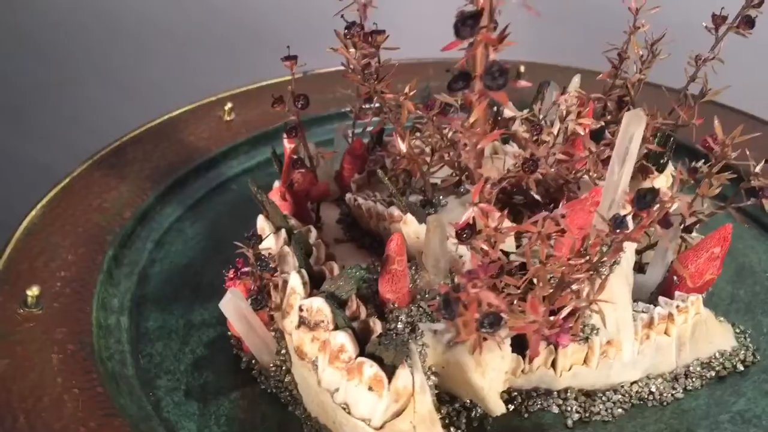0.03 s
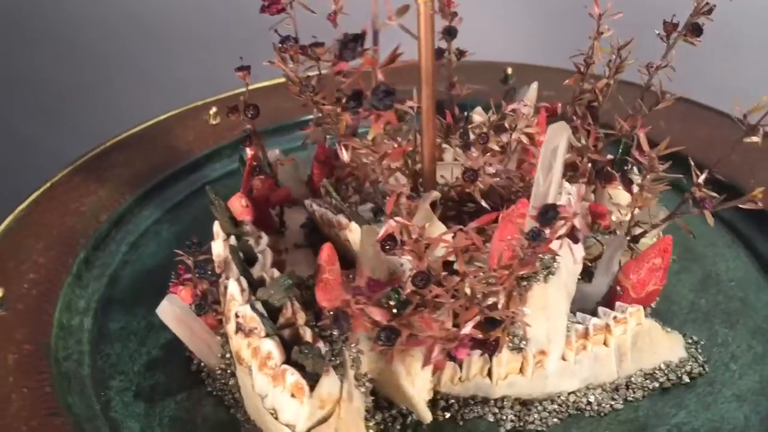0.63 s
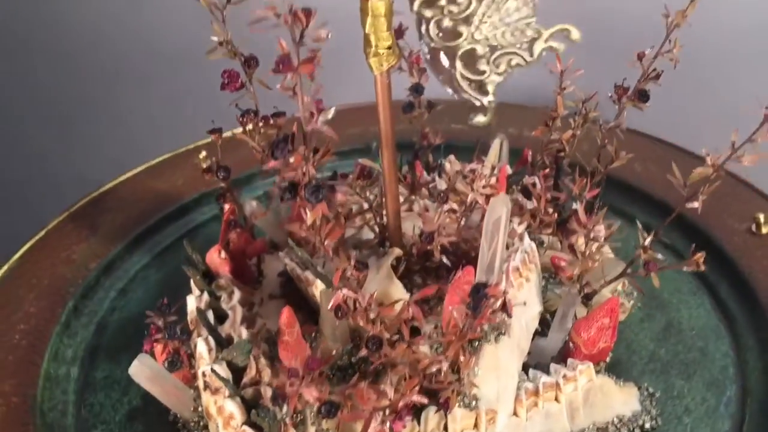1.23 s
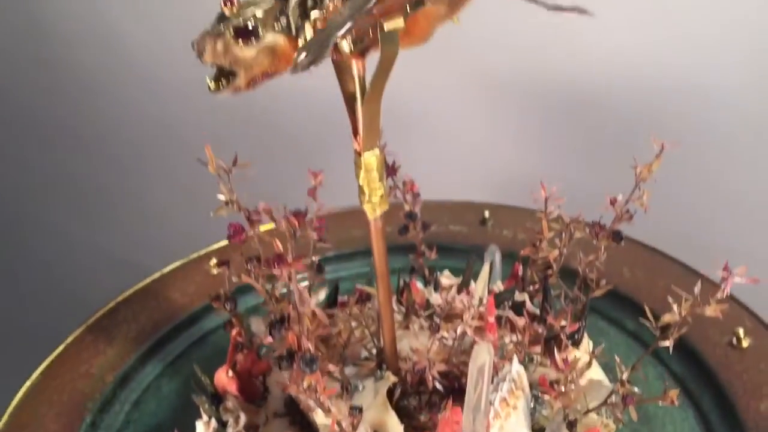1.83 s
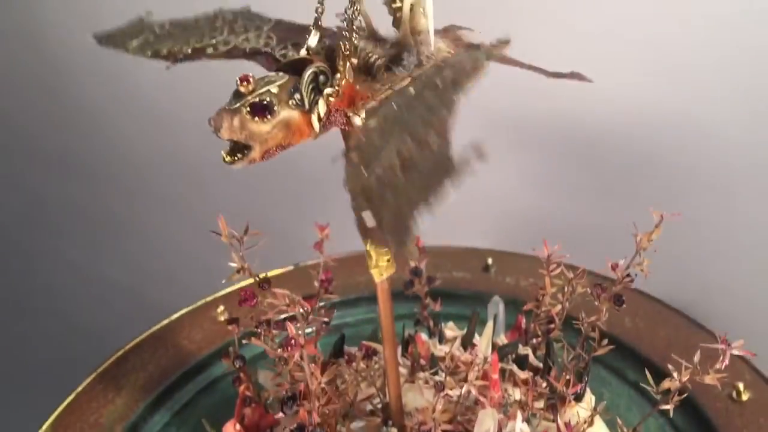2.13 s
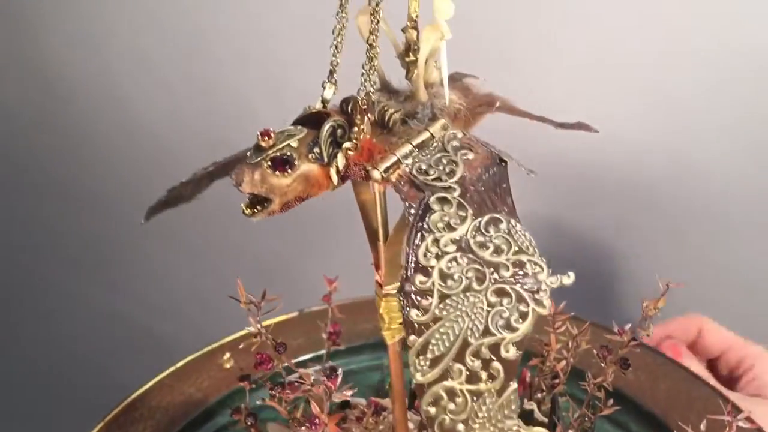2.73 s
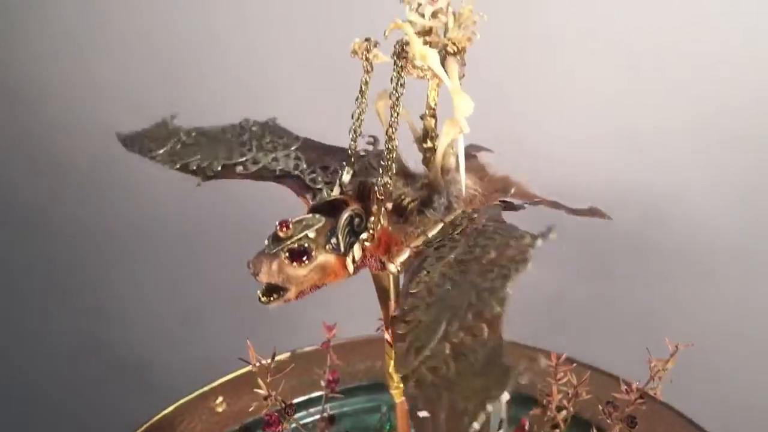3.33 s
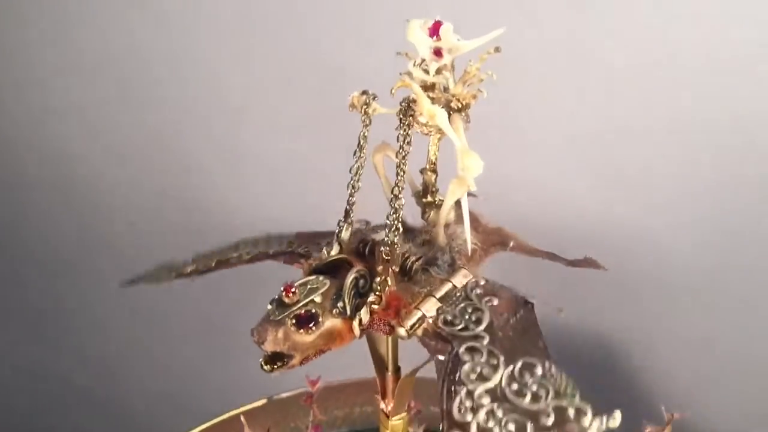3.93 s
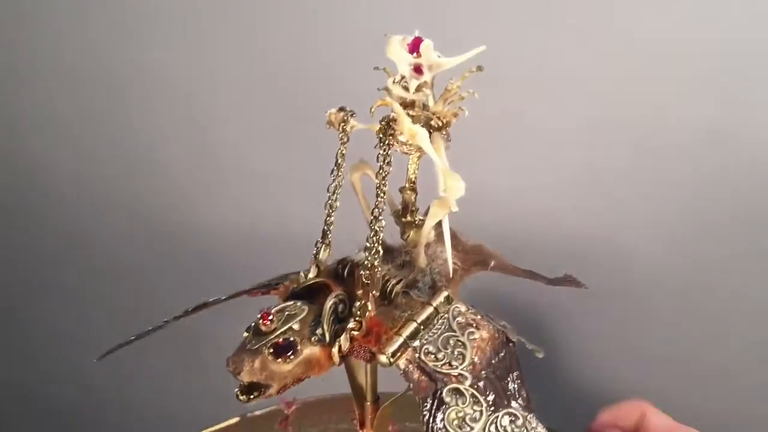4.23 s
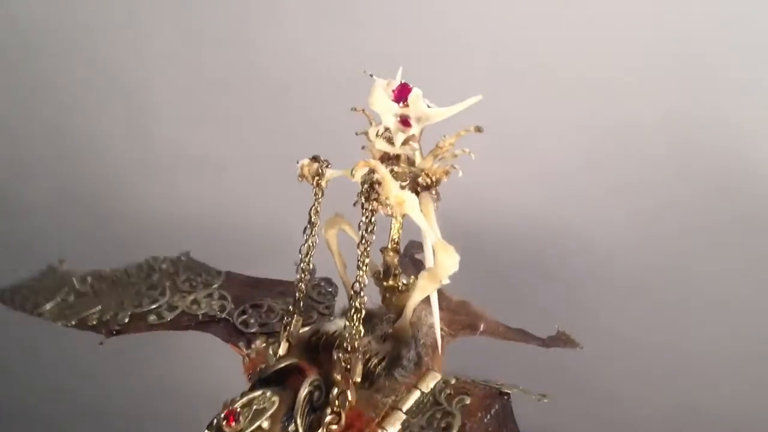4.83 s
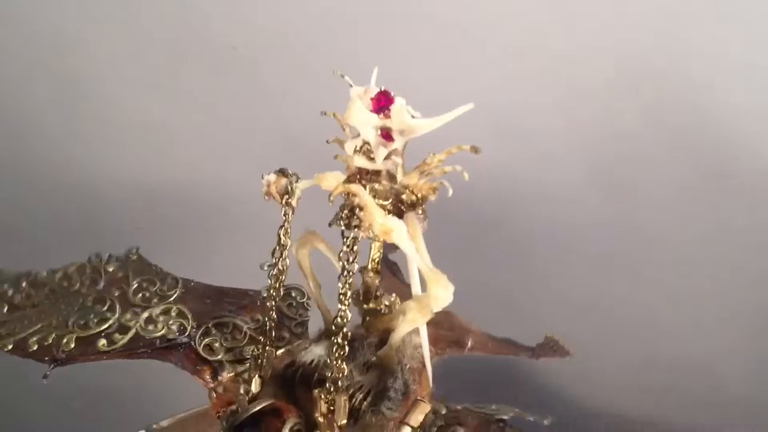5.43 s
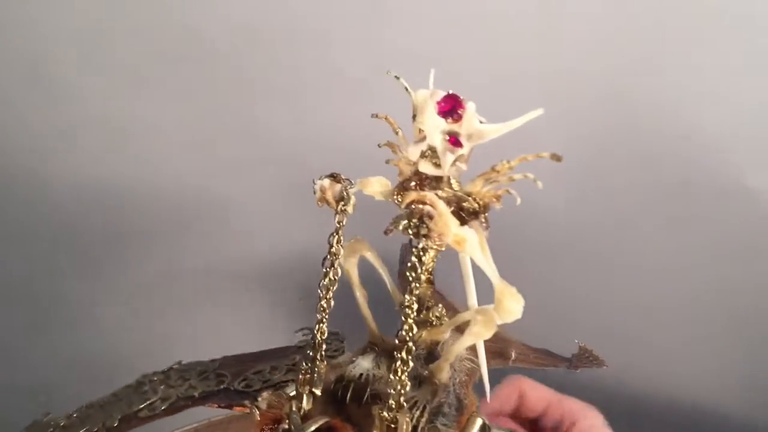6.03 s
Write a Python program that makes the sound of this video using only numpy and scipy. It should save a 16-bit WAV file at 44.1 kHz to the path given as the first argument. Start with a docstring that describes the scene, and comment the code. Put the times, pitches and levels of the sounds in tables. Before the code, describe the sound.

A small hand-cranked automaton flaps its metal wings, heard close by in a quiet room. Cams, rods and chains click and clack unevenly in a hollow wooden base, some knocks chattering or bouncing briefly. Faint hinge creaks, tiny squeaks and metal ticks fall between them, while a soft rubbing rumble swells and rests with each turn. A tight cluster of sharper clacks comes at the end.

```python
"""In a quiet room, a hand-cranked automaton flaps its delicate metal wings, heard from close by.
Cams, rods and chains knock and chatter in the wooden base, which booms softly as the load shifts.
Struck parts ring, rubbing ones squeak, hinges creak, small metal parts tick and the trimmings rustle.
The cam (a shaped wheel) rubs and rumbles through the case, swelling and resting with each uneven turn."""
import sys
import numpy as np
from scipy import signal
from scipy.fft import rfft, irfft, next_fast_len
from scipy.io import wavfile
from scipy.ndimage import uniform_filter1d

SR = 44100
rng = np.random.default_rng(int(sys.argv[2]) if len(sys.argv) > 2 else 0)


def inscribe(sig):
    """Save sig as 16-bit PCM at rate SR to the path in sys.argv[1].

    A 1-D sig is mono; a 2-D sig holds one channel per row.
    Samples are clipped to [-1, 1] before scaling.
    """
    pcm = np.round(np.clip(np.atleast_2d(sig).T, -1, 1) * 32767)
    wavfile.write(sys.argv[1], SR, pcm.astype(np.int16))


N = 268128
TIME = np.arange(N) / SR
EVENT_SIZE = 16384  # samples set aside for one short sound
AGE = np.arange(EVENT_SIZE) / SR  # seconds since that sound began

# The notes at which the case and rods ring. Each row: pitch in Hz, level in dB, seconds to fade by 60 dB.
CASE_MODES = [(226, -10, 0.2), (415, -18.5, 0.19), (269, -18, 0.35), (518.2, -12.5, 0.2),
              (599.7, -5.5, 0.29), (654.2, -2.5, 0.19), (755, -42, 0.14), (824.5, -7, 0.22),
              (959, -13.5, 0.27), (1070, -8.5, 0.14), (1154, -2.5, 0.17), (1202.6, -2.5, 0.18),
              (1345, -1.5, 0.1), (1418, 1, 0.072), (1468, -5, 0.18), (1677, -10, 0.12), (1777, -10.5, 0.19),
              (1930, -9, 0.15), (1980, -6, 0.13), (2137, -3, 0.079), (2280, -12, 0.21), (2554, -3.5, 0.14),
              (2706, -3, 0.05), (3306, -9, 0.14), (3315, -10, 0.21), (3560, -9, 0.19), (5660, -24, 0.3)]
# The blur of ringing between those notes. Each row: frequency in Hz, gain in dB.
CASE_TONE = [(50, -42), (150, -24), (240, -16), (400, -19), (650, -12.5), (1350, -3), (1700, -10.5),
             (3300, -10.5), (4800, -16.5), (6100, -14), (7600, -25.5), (9500, -23), (10600, -34),
             (16000, -40)]
# The tone of the rubbing cam, the rumbling base and the room's air. Each row: frequency in Hz, gain in dB.
RUB_TONE = [(100, -2.5), (230, 3), (450, 0), (780, 2), (1150, -4), (1600, -10.5), (3000, -12), (8000, -11)]
RUMBLE_TONE = [(22, -22), (55, -14), (72, 3.5), (86, 6.5), (105, 2.5), (160, -10.5), (225, 0.5), (280, -11),
               (350, -13.5), (1000, -45)]
AIR_TONE = [(15, -61), (45, -4), (80, 2), (150, -4), (230, -6), (400, -12.5), (640, -18), (1300, -18.5),
            (2000, -17), (3000, -21.5), (6000, -27.5), (16000, -32.5)]
# The times in seconds when the cam passes its resting point, wings down.
CAM_RESTS = [0.4, 1.17, 3, 5, 7]
# The load as the wings lift and lower. Each row: share of one turn from 0 to 1, gain in dB.
TURN_LOAD = [(0, -14), (.12, -2), (.3, 2.5), (.47, -6), (.56, 2), (.71, -5), (.85, 0.5), (1, -14)]
# How hard the hand drives the crank. Each row: time in seconds, gain in dB.
HAND_EFFORT = [(0, -49), (.5, -60.5), (1.8, -56), (2.6, -60), (3.5, -53), (4.2, -54.5), (4.9, -64),
               (5.8, -63), (6.08, -42)]
# Short pitched notes: the ring of struck parts and the squeaks of rubbing ones.
# Each row: start in seconds, length in seconds, pitch in Hz, level in dB.
RINGS_AND_SQUEAKS = [(0, 0.032, 1218, -39), (1.155, 0.039, 1185, -34.5), (1.84, 0.07, 1567, -48.5),
                     (1.872, .16, 803, -53), (2.831, .0043, 1316, -27), (3.165, 0.097, 748, -56),
                     (3.53, .15, 777, -56), (4.21, 0.019, 1076, -38.5), (5.23, 0.07, 822, -42.5),
                     (5.354, 0.03293, 1398, -46.5), (5.884, 0.08, 1058, -55.5), (5.948, 0.012, 1077, -33.5)]
# Knocks of the moving parts. Each row: start in seconds, level in dB before the tone is shaped,
# thud in dB, hardness (treble) in dB, chatter time in seconds, wait for a bounce in seconds.
KNOCKS = [(.0007, -42.5, 1.5, 9, 0.002, 0.00041), (.106, -50, 0.5, -0.5, 0.013, 0.0013),
          (.238, -40.5, -8, -6.5, 0.011, 0.025), (.355, -38.5, 0.5, -21, 0.0026, 0),
          (.44, -39.5, -2.5, -31, 0.0059, 0), (.68, -52, 12, -30, .009, 0),
          (.972, -53, 8.5, -30, 0.0092, 0.00053), (0.9842, -44, 7.5, -37, 0.011, 0.00043),
          (1.149, -44.5, -6, -22, 0.0061, 0), (1.161, -36.5, -5, -14.5, 0.0035, 0.0014),
          (1.212, -53, -5, 3, .005, 0), (1.7, -58, 0, -18, .025, 0), (1.787, -46.5, -4, -11, 0.048, 0.0002),
          (1.814, -40, -17, -4.5, 0.027, .018), (1.944, -41, -23, -16.5, .008, 0),
          (1.974, -38.5, -8, -36, 0.015, 0.00026), (2.064, -37.5, 3.5, -8, .006, 0.00065),
          (2.103, -35.5, -10, -24.5, 0.0014, 0.00023), (2.309, -60, 9, -6, .012, 0),
          (2.6591, -44.5, 3, 5.5, 0.0083, 0.00014), (2.668, -37.5, -10, -2, 0.013, 0),
          (2.693, -43, 7, -7, .016, 0.00016), (2.831, -36.5, -18, -10, 0.0059, .015),
          (2.914, -54, -6, -5, .0028, 0.0028), (3.19, -52, -12, -16.5, 0.018, 0.0015),
          (3.444, -40, 2.5, 8.5, 0.012, .012), (3.495, -45.5, -4, -12, 0.024, 0.00025),
          (3.617, -40, -17.5, -23, 0.0073, 0.00085), (3.832, -44, -2, -37, .012, 0.00018),
          (3.937, -44, 6, -20.5, .012, 0.01), (4.1594, -49.5, -6, -29, 0.0024, 0.024),
          (4.2135, -47.5, 12, -25.5, .011, 0.0012), (4.411, -34, -6, -16.5, .003, 0.01),
          (4.954, -46, 5.5, -24, .019, 0.00063), (4.991, -41, 0, 2, .013, .016),
          (5.2192, -41, -10, -21.5, .029, 0.031), (5.348, -42.5, -1, -23, .008, 0.024),
          (5.957, -37, 7.5, -11.5, .011, 0.0004), (5.971, -45.5, 11, 7, 0.0026, 0.002),
          (6.0019, -43, 13, 5.5, 0.014, .02)]
# The frequencies in Hz that shape a knock: thud, the two ends of the middle range, ring, hardness.
KNOCK_BANDS = [280, 680, 1450, 3300, 10000]
# Creaking hinges and rustling trimmings. Each row: start in seconds, length in seconds, level in dB.
CREAKS = [(.26, 0.012, -39.5), (.995, 0.017, -48.5), (1.497, 0.026, -55.5), (1.552, 0.043, -52),
          (3.227, 0.0074, -39), (3.245, 0.022, -50), (3.446, 0.031, -46), (4.225, 0.041, -52),
          (4.738, 0.018, -58.5), (4.799, 0.017, -58.5), (5.942, 0.0095, -42), (5.97, 0.092, -41)]
RUSTLES = [(.815, 0.02, -54), (.993, 0.0085, -58), (1.824, 0.03, -42.5)]
# Ticks of small metal parts and booms of the hollow base. Each row: start in seconds, level in dB.
TICKS = [(0.613, -56), (2.256, -60), (3.2271, -64.5), (3.8694, -57.5), (5.5501, -58), (5.9718, -46.5),
         (6.002, -52), (6.011, -57), (6.025, -44.5)]
BOOMS = [(.802, -59.5), (1.129, -51.5), (1.87, -55.5), (2.631, -57), (2.851, -57), (3.579, -54),
         (5.038, -59), (5.982, -54)]
# The tone of the hinges, the ticks and the rustles. Each row: frequency in Hz, gain in dB.
HINGE_TONE = [(700, -43), (1400, -15), (1800, 0.5), (2150, 8.5), (2400, 0), (2700, 5), (3100, -11),
              (4200, -18.5), (9000, -31)]
TICK_TONE = [(1000, -14), (2800, -8), (3700, 6.5), (4600, 5), (7000, -9.5), (9000, 2), (10500, -7),
             (12400, 5.5), (16000, -16)]
RUSTLE_TONE = [(300, -8.5), (1200, -1), (3200, 4.5), (6500, -9.5), (9000, -3), (11000, -7.5), (13000, -4.5),
               (16000, -11)]


def undb(db):
    """Turn decibels into a number to multiply by."""
    return 10 ** (np.asarray(db) / 20)


def unit(x):
    """Scale a sound to an energy of one."""
    return x / np.sqrt(np.sum(x ** 2) + 1e-18)


def level(x, db, seconds):
    """Scale a sound so that its energy, spread over that many seconds, has the given level."""
    return unit(x) * undb(db) * np.sqrt(seconds * SR)


def fade(t60):
    """A smooth dying away that loses 60 dB in t60 seconds."""
    return np.exp(-np.log(1000) * AGE / t60)


def colour(x, points):
    """Shape the tone of a sound along a curve of (Hz, dB) points."""
    size = next_fast_len(len(x), real=True) * 2
    hz, db = np.transpose(points)
    bin_hz = np.maximum(np.arange(size // 2 + 1) * SR / size, 1)
    gain = undb(np.interp(np.log(bin_hz), np.log(hz), db))
    # fold the filter so that it rings only after a sound, never before it
    cepstrum = irfft(np.log(gain))
    cepstrum[1:size // 2] *= 2
    cepstrum[size // 2 + 1:] = 0
    return irfft(rfft(x, size) * np.exp(rfft(cepstrum)))[:len(x)]


def add(track, start_s, sound):
    """Mix a sound into the track at the given time."""
    start = int(np.clip(start_s * SR, 0, N - 1))
    track[start:start + len(sound)] += sound[:N - start]


def contacts(size, per_second, spread_db):
    """Tiny impacts at random times and of uneven strength."""
    hit = rng.random(size) < per_second / SR
    return hit * rng.choice([-1, 1], size) * undb(spread_db * rng.standard_normal(size))


def case_ring(modes, modes_db):
    """The case answers one tap with a crack, a blur of ringing, its own notes and a little room echo."""
    crack, blur, room = rng.standard_normal((3, EVENT_SIZE))
    lows = signal.sosfilt(signal.butter(2, 600, fs=SR, output="sos"), blur)
    tail = unit(lows * fade(0.16) + (blur - lows) * fade(0.15))
    wash = tail + undb(-2) * unit(crack * fade(0.005)) + undb(-21) * unit(room * fade(0.27))
    # each spot that is tapped wakes the notes in its own mix
    strengths = undb(4 * rng.standard_normal(len(modes)))
    phases = np.exp(2j * np.pi * rng.random(len(modes)))
    notes = ((strengths * phases) @ modes).imag
    return unit(unit(colour(wash, CASE_TONE)) + undb(modes_db) * unit(notes))


def cam_load(catch_db=2.5, catches_per_second=14):
    """Pressure on the cam follows each turn and the hand's effort, and wavers as the surfaces catch."""
    turn_share = np.interp(TIME, CAM_RESTS, np.arange(len(CAM_RESTS))) % 1
    turn_db = np.interp(turn_share, *np.transpose(TURN_LOAD))
    effort_db = np.interp(TIME, *np.transpose(HAND_EFFORT))
    catch = np.interp(TIME * catches_per_second, np.arange(256), rng.standard_normal(256))
    return undb(effort_db + turn_db + catch_db * catch)


def cam_rub(modes):
    """The cam slides and bumps over small flaws, keeping the case humming and the base rumbling."""
    slide = unit(contacts(N, per_second=900, spread_db=5))
    bumps = unit(contacts(N, per_second=45, spread_db=4))
    hum = signal.fftconvolve(slide + undb(-1) * bumps, case_ring(modes, modes_db=1.5))[:N]
    rub = level(colour(hum, RUB_TONE), -4, N / SR)
    rumble = level(colour(rng.standard_normal(N), RUMBLE_TONE), -7, N / SR)
    return (rub + rumble) * cam_load()


def room_air():
    """The still air of the room is a faint, steady, low hiss."""
    return level(colour(rng.standard_normal(N), AIR_TONE), db=-66.5, seconds=N / SR)


def rings_and_squeaks(pitch_waver=0.02, rough_db=3, overtone_db=-20, tail_db=-5, tail_t60=0.19):
    """A struck part rings or a rubbing one squeaks: one short, unsteady note that lingers in the case."""
    out = np.zeros(N)
    for start, length, hz, db in RINGS_AND_SQUEAKS:
        # smoothed noise makes the pitch and the loudness wander
        drift, flutter = uniform_filter1d(rng.standard_normal((2, EVENT_SIZE)), size=256) * np.sqrt(256)
        phase = 2 * np.pi * np.cumsum(hz * (1 + pitch_waver * drift)) / SR
        loudness = np.sin(np.pi * np.minimum(AGE / length, 1)) * undb(rough_db * flutter)
        note = loudness * (np.sin(phase) + undb(overtone_db) * np.sin(2 * phase))
        tail = signal.fftconvolve(note, rng.standard_normal(EVENT_SIZE) * fade(tail_t60))[:EVENT_SIZE]
        add(out, start, level(unit(note) + undb(tail_db) * unit(tail), db, seconds=length))
    return out


def blows(bounce_db=-2.5, bounce_hardness_db=-9):
    """List every knock, plus a weaker, duller bounce where its wait is over 5 milliseconds."""
    for start, db, thud_db, hard_db, chatter_s, wait_s in KNOCKS:
        yield start, db, thud_db, hard_db, chatter_s
        if wait_s > 0.005:
            yield start + wait_s, db + bounce_db, thud_db, hard_db + bounce_hardness_db, chatter_s


def knocks(modes, clean_s=0.0022, tight_s=0.016, swell_share=0.067, split_hz=520):
    """A loose part lands, then chatters; the longer the chatter, the weaker its first hit."""
    out = np.zeros(N)
    filters = [signal.butter(3, split_hz, kind, fs=SR, output="sos") for kind in ("low", "high")]
    for start, db, thud_db, hard_db, chatter_s in blows():
        chatter = contacts(EVENT_SIZE, per_second=1100, spread_db=4) * np.exp(-AGE / chatter_s)
        force = unit(chatter) * np.sqrt(chatter_s / clean_s)
        force[0] += np.exp(-chatter_s / tight_s)  # the first hit
        ringing = signal.fftconvolve(force, case_ring(modes, modes_db=-1))[:EVENT_SIZE]
        # a loose joint takes up its load gradually, a tight one at once
        ringing *= 1 - np.exp(-AGE / (swell_share * chatter_s))
        # the wooden base takes a share of each blow as a thud
        thud, clack = (unit(signal.sosfilt(band, ringing)) for band in filters)
        knock = level(clack + undb(-14) * thud, db, seconds=0.05)
        ring_db = 4 + 0.45 * hard_db  # a harder blow also rings more brightly
        tone = list(zip(KNOCK_BANDS, [thud_db, 0, 0, ring_db, hard_db]))
        add(out, start, colour(knock, tone))
    return out


def stick_and_slip(rows, tone, per_second, tail_db, tail_t60):
    """A part grips and lets go in a quick run of tiny jolts, each of which rings briefly."""
    out = np.zeros(N)
    for start, length, db in rows:
        stroke = np.sqrt(np.maximum(np.sin(np.pi * np.minimum(AGE / length, 1)), 0))
        ring = undb(tail_db) * unit(rng.standard_normal(EVENT_SIZE) * fade(tail_t60))
        ring[0] += 1  # the jolt itself
        jolts = stroke * contacts(EVENT_SIZE, per_second, spread_db=1.5)
        sound = signal.fftconvolve(jolts, ring)[:EVENT_SIZE]
        add(out, start, level(colour(sound, tone), db, seconds=length))
    return out


def hinge_creaks():
    """A hinge slips in jolts far enough apart to sound grainy."""
    return stick_and_slip(CREAKS, HINGE_TONE, per_second=540, tail_db=-2.5, tail_t60=0.14)


def metal_ticks(snap_t60=0.007, tail_db=-7, tail_t60=0.095):
    """Small, hard parts touch with a bright snap and a faint tail."""
    out = np.zeros(N)
    for start, db in TICKS:
        snap, tail = rng.standard_normal((2, EVENT_SIZE))
        tick = unit(snap * fade(snap_t60)) + undb(tail_db) * unit(tail * fade(tail_t60))
        add(out, start, level(colour(tick, TICK_TONE), db, seconds=0.05))
    return out


def base_booms(hz=84, pitch_scatter=0.1, swell_s=0.011, t60=0.27):
    """The lowest note of the hollow base swells and dies away each time the load shifts."""
    out = np.zeros(N)
    for start, db in BOOMS:
        pitch = hz * (1 + pitch_scatter * rng.standard_normal())
        swell = (1 - np.exp(-AGE / swell_s)) ** 2
        boom = np.sin(2 * np.pi * pitch * AGE) * swell * fade(t60)
        add(out, start, level(boom, db, seconds=0.05))
    return out


def trimming_rustles():
    """The trimmings slip in jolts so close together that they blur into a rustle."""
    return stick_and_slip(RUSTLES, RUSTLE_TONE, per_second=3500, tail_db=-3, tail_t60=0.13)


def scene():
    """Mix all the moving parts and the room's air into one channel."""
    modes = np.array([undb(db) * unit(fade(t60)) * np.exp(2j * np.pi * hz * AGE)
                      for hz, db, t60 in CASE_MODES])
    mix = hinge_creaks() + trimming_rustles() + room_air()
    mix += knocks(modes) + metal_ticks() + rings_and_squeaks() + base_booms() + cam_rub(modes)
    return mix[None]


def record(dry):
    """Cut away the very highest treble, above 15950 Hz."""
    return signal.sosfilt(signal.ellip(10, .2, 70, 15950, fs=SR, output="sos"), dry)


dry = scene()
out = record(dry)
inscribe(out)
```